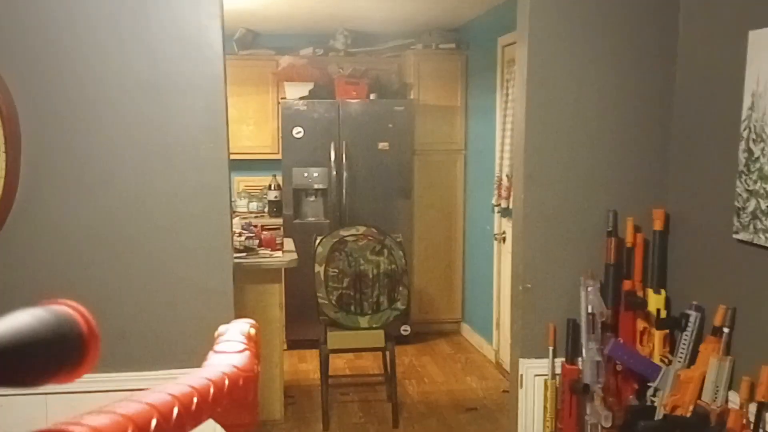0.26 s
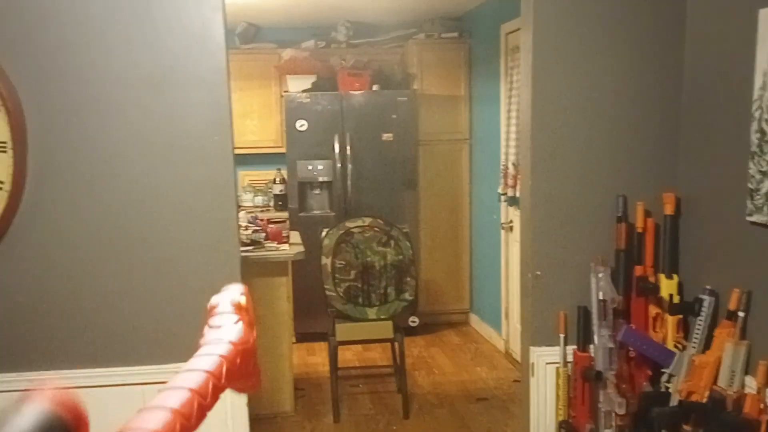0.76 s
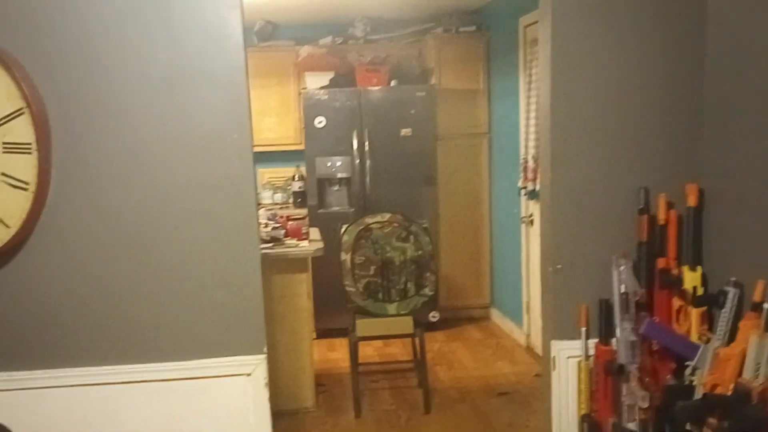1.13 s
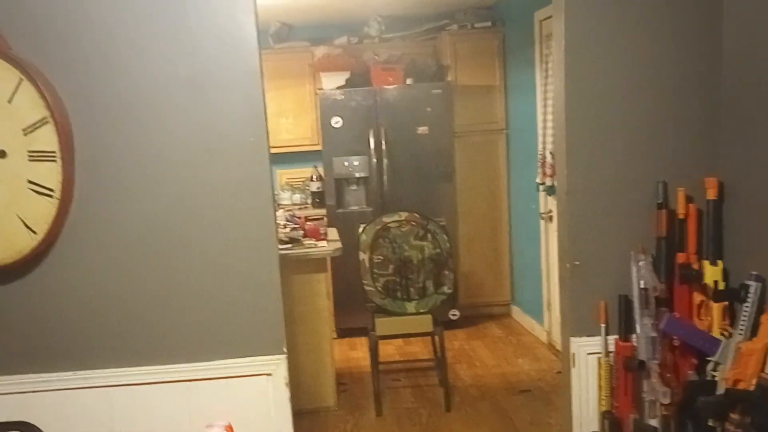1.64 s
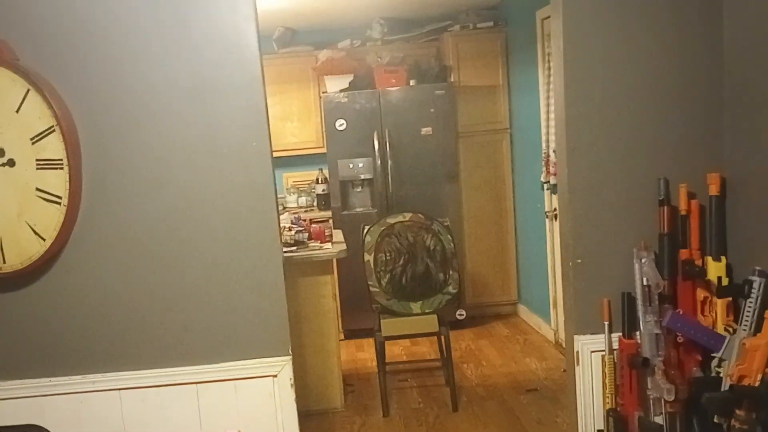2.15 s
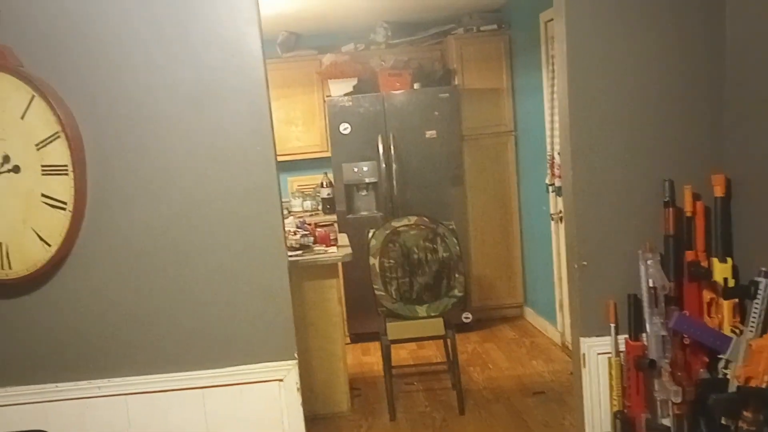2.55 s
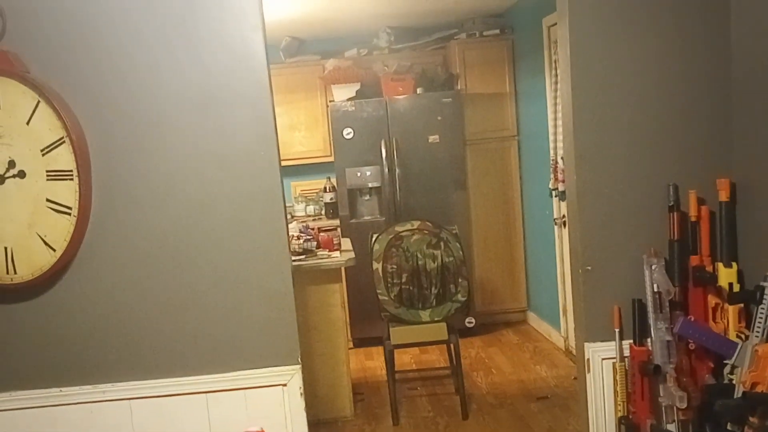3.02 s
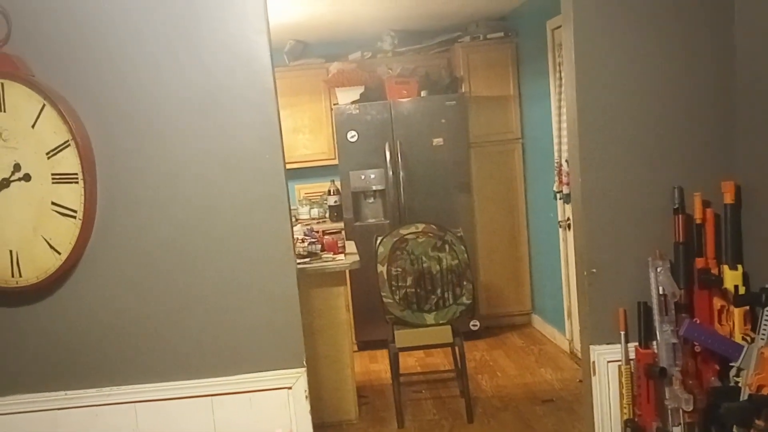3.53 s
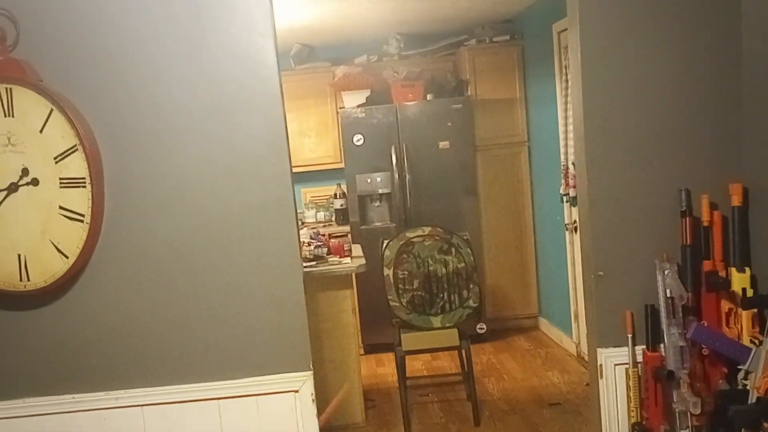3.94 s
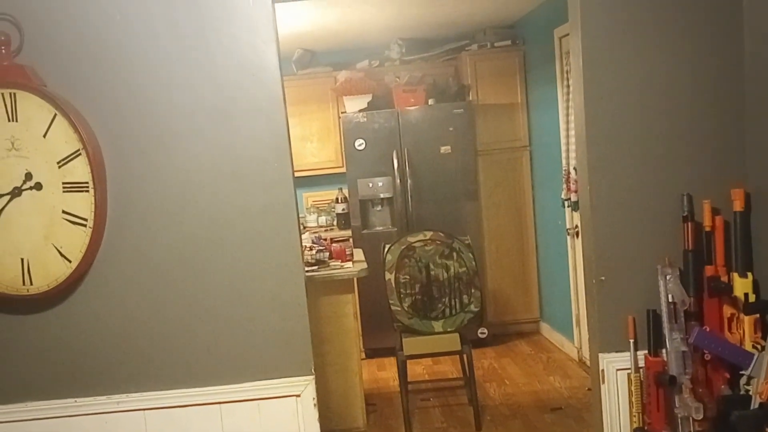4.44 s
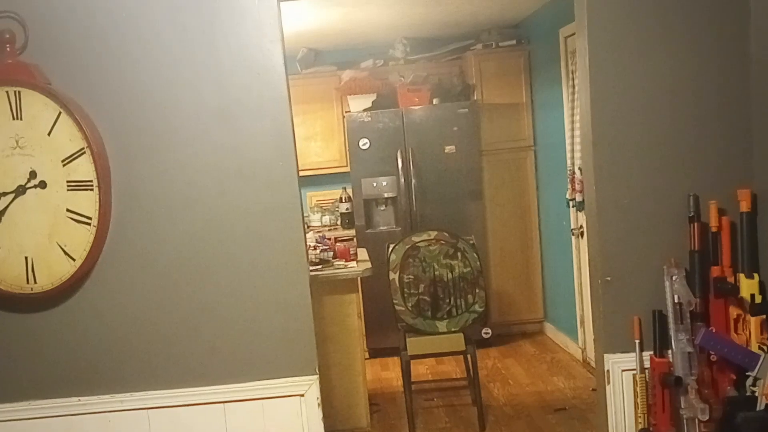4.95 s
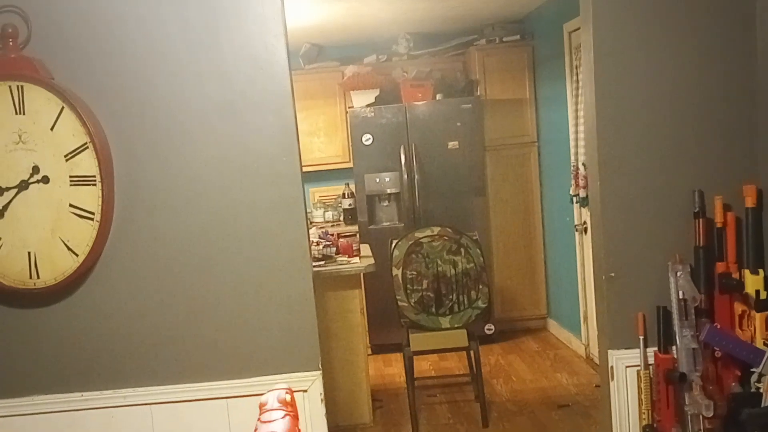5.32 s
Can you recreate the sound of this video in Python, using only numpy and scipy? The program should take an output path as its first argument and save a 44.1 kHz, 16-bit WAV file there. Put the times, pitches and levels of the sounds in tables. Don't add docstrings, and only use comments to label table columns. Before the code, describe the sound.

A plastic spring-powered dart blaster is handled very close to a stereo microphone in a hallway. For the first 0.9 seconds there are only small shell creaks and dull ticks over quiet air and a faint, wavering low appliance hum. Latch clicks begin near 0.95, a rapid ratcheting pull runs from 1.02 to 1.1, and the slide is pushed home with a rattling clack around 1.4. At 2.0 the first shot bursts out: a brief rush, loud hollow pop, bright crack and piston rebound. Soft bumps and clacks follow, with repriming from 2.2 to 2.7 and a second shot at 2.95. Another ratcheting cycle at 3.15 to 3.6 leads to the third shot at 4.0. The last priming spans 4.2 to 4.75, then near quiet, a tiny creak at 5.45 and the final pop at 5.5. Each sharp knock leaves a short hall ring that is quickly choked off.

```python
import sys
import numpy as np
from scipy import signal
from scipy.fft import rfft, irfft
from scipy.io import wavfile
from scipy.ndimage import uniform_filter1d

SR = 44100
rng = np.random.default_rng(int(sys.argv[2]) if len(sys.argv) > 2 else 0)


def boost_factor(decibels):
    exponent = np.asarray(decibels, float) / 20
    return 10 ** exponent


def unload_wav(signal):
    wavfile.write(
        sys.argv[1],
        SR,
        np.round(np.clip(np.atleast_2d(signal).T, -1, 1) * 32767).astype(np.int16),
    )


N = 246078

# frequency in Hz, density in dB per Hz.
HOUSE_AIR = [(18, -45), (30, -22), (76, -2.5), (196, -4.5), (254, -3.5), (311, -14), (403, -5.5),
             (1040, -16), (6150, -29.5), (8810, -47), (14000, -38)]
# middle in seconds, level in dB, half length in seconds.
DRONE_SWELLS = [(0.001, -61, .03), (.17, -67, .04), (.36, -66, 0.039), (.53, -67, 0.054),
                (1.27, -71.5, 0.05), (1.53, -57.5, 0.037), (1.67, -73, .05), (2.25, -56.5, 0.054),
                (2.53, -61.5, .07), (2.75, -67, 0.068), (3.17, -57.5, 0.029), (3.45, -70, 0.062),
                (3.77, -64, 0.099), (4.33, -64.5, 0.11), (4.6, -67, 0.032), (4.86, -67, 0.047),
                (5.08, -65, 0.13)]
# start in seconds, level in dB, ring in Hz, ring width in Hz, t60 in s.
CREAKS = [(0.027, -53.5, 2420, 485, 0.26), (.050, -63, 5250, 910, 0.21), (.095, -62, 2580, 500, 0.073),
          (.092, -64, 4600, 700, 0.086), (0.305, -48, 580, 300, 0.19), (0.311, -47.5, 1500, 1070, 0.19),
          (0.317, -53, 3670, 590, 0.22), (0.459, -43, 1500, 300, 0.11), (0.537, -65, 4940, 900, 0.15),
          (0.572, -44.5, 1250, 490, 0.22), (.664, -38.5, 1890, 397, 0.073),
          (0.657, -47.5, 4520, 1500, 0.051), (.664, -58, 3500, 495, 0.12), (0.774, -61.5, 3600, 464, 0.24),
          (.922, -57, 2940, 2000, 0.18), (3.968, -56.5, 1700, 504, .08), (5.446, -61.5, 1500, 585, 0.11)]
# start in seconds, level in dB.
CREAK_TICKS = [(0.028, -55.5), (0.305, -66), (.319, -67), (0.458, -59), (.537, -61), (.571, -73),
               (0.655, -47), (0.662, -54), (0.92, -55.5), (3.968, -68.5)]
# time in seconds, crack in dB, hollow part in dB re crack.
SLIDE_KNOCKS = [(0.9437, -34.5, -9), (0.9554, -27, -6.5), (0.9653, -33.5, -2.5), (0.976, -34.5, -5.5),
                (0.9979, -19.5, -19.5), (1.2363, -25, -7.5), (1.3211, -25, -13), (2.1839, -21.5, -10),
                (2.2065, -21.5, -8.5), (2.324, -23, -7), (2.5373, -25, -18.5), (2.601, -34.5, -2),
                (2.612, -23, -6), (3.1385, -25, 0), (3.1625, -32.5, 4.5), (3.2118, -20, 1),
                (3.4065, -23, -10), (3.4484, -32, 1), (3.468, -25.5, -0.5), (4.191, -28, -2.5),
                (4.2115, -19, -3.8), (4.3776, -27, 3), (4.39, -26.5, 7), (4.5941, -24.5, -8),
                (4.6448, -33.5, 0), (4.6578, -25, -6), (4.675, -54, -10.5)]
# first tooth in seconds, end stop in seconds, teeth (count),
# crowding of the teeth towards the end (0 to 1), tooth level in dB.
PULLS = [
    (1.024, 1.0942, 8, 0.76, -23.5),
    (2.3383, 2.404, 9, 0.18, -23.5),
    (3.225, 3.2855, 9, 0.2, -22.5),
    (4.399, 4.4845, 9, 0.33, -23),
]
# first tooth in seconds, end stop in seconds, tooth in dB, end stop in dB.
PUSHES = [
    (1.354, 1.422, -22.5, -18.5),
    (2.6397, 2.688, -22.5, -16.5),
    (3.492, 3.567, -21.5, -20.5),
    (4.6831, 4.7466, -22, -20),
]
# frequency in Hz, density in dB per Hz.
CRACK_COLOUR = [(900, 0), (2000, -7), (6000, -5.5), (16000, -5)]
# frequency in Hz, width in Hz, level in dB.
SHELL_MODES = [(1220, 46, -5), (1700, 130, -4.5), (2307, 150, -9), (3500, 93, 1), (4310, 140, -2.5),
               (4600, 73, -0.5), (5615, 490, -2.5), (6470, 590, -4), (9600, 310, -12)]
# frequency in Hz, width in Hz, level in dB.
CAVITY_MODES = [(480, 140, -6.5), (700, 78, 2.5), (923, 74, -1.5)]
# start in seconds, level in dB, ring in Hz, width in Hz, t60 in s.
BUMPS = [(2.208, -41.5, 366, 200, 0.087), (2.311, -30.5, 670, 250, 0.14), (3.201, -41, 596, 250, 0.14),
         (3.430, -34, 493, 200, 0.32), (3.487, -45.5, 250, 100, 0.061), (3.759, -52.5, 493, 150, .08),
         (3.780, -51, 480, 150, 0.047), (4.213, -34, 374, 150, 0.12), (4.265, -40, 225, 80, 0.049),
         (4.37, -46.5, 700, 300, 0.14), (1.4, -48, 300, 120, 0.1), (1.095, -46.5, 310, 100, 0.12),
         (3.279, -44.5, 300, 122.3, 0.12)]
# pop in seconds, pop in dB, crack in dB, piston travel in seconds, rebound delay in seconds.
SHOTS = [
    (1.995, -3, -14.5, 0.0092, 0.01),
    (2.9565, -1.5, -16, 0.0078, 0.0042),
    (4.0084, -3, -15.5, 0.01, 0.008),
    (5.4902, -1.5, -12.5, 0.0094, 0.0094),
]
# frequency in Hz, level in dB, t60 in seconds.
BARREL_MODES = [(674, -0.5, 0.0084), (1500, -10, 0.0088), (200, -18.5, 0.028)]
# delay in seconds, level in dB.
FIRST_REFLECTIONS = [
    [(.0011, -15.5), (.0027, -2), (.0046, -7.5)],
    [(.0008, -2.5), (.0021, -5.5), (.0039, -4)],
]
# frequency in Hz, left minus right in dB.
PORT_TILT = [(100, 1.5), (500, -.6), (1200, -1.1), (4000, 1.2), (8000, 3.3), (13000, 5.4)]
# frequency in Hz, left-right likeness (0 to 1).
LIKENESS = [(30, .4), (90, 1), (300, 0.82), (700, 0.23), (1400, 0.13), (3000, 0.42), (16000, 0.19)]
# frequency in Hz, echo in dB, t60 in seconds, gate closing in seconds, gate leak in dB.
HALL_TAIL = [(100, -20, 0.87, 0.17, -11.5), (300, -16, 0.44, 0.29, -12.5), (700, -20.5, 0.55, 0.19, -21.5),
             (2000, -10, 0.53, 0.21, -17), (5000, -13.5, 0.59, 0.2, -24.5), (9900, -12, 0.21, 0.18, -38.5),
             (16500, -20.5, 0.75, 0.17, -37)]
# frequency in Hz, width in Hz, level in dB.
HALL_MODES = [(102, 9.2, 3), (332, 12, 8), (480, 8.9, 5), (625, 60, 6.5), (665, 170, 2), (913, 13, 7),
              (1700, 42, -4.5)]
# frequency in Hz, gain in dB.
GRILLE = [(900, 0), (1100, 0), (1700, 7), (2300, 3), (3000, -3.5), (4200, -1), (5500, -3), (6600, -3),
          (7600, -10), (9200, -5), (13500, -8.5), (14500, -4), (15600, 3.5), (16400, -15)]

AIR_DB, HUM_LINE_DB, HISS_DB = -67, -73.5, -92.5
DRONE_REST_DB = -85
BOOM_DELAY_S, BOOM_DB, BOOM_HALF_S = 0.065, -47.5, 0.058
TOOTH_JITTER_S, TOOTH_SCATTER_DB, TOOTH_GROWTH_DB = 0.0004, 1.16, 1
HOLLOW_FIRST_DB, HOLLOW_SAG_DB, HOLLOW_LAST_DB, HOLLOW_STOP_DB = -11.5, -4.5, -3.5, -4.5
PULL_STOP_DB, PUSH_TEETH = -14.5, 7
BOUNCE_S, BOUNCE_DB = 0.01, -1.5
SHELL_UNEVEN_DB = 3.0
RUSH_DB, REBOUND_DB = -20, -17
PORT_LAG = 10
GATE_STEEPNESS = 9
HALL_CLUMPS_DB, HALL_PATCHY_DB = 1.1, 1.2


def rms_one(x):
    return x / np.sqrt(np.mean(x ** 2) + 1e-20)


def at_hz(points, hz, column=1):
    points = np.array(points)
    return np.interp(np.log(hz), np.log(points[:, 0]), points[:, column])


def coloured(x, points):
    size = 4096
    hz = np.maximum(np.arange(size // 2 + 1), 1) * SR / size
    cepstrum = irfft(np.log(boost_factor(at_hz(points, hz))))
    cepstrum[1:size // 2] *= 2
    cepstrum[size // 2 + 1:] = 0
    impulse = irfft(np.exp(rfft(cepstrum)))
    return signal.oaconvolve(x, impulse)[:len(x)]


def resonance(x, hz, width_hz):
    r = np.exp(-np.pi * width_hz / SR)
    feed = np.array([1, 0, -1]) * (1 - r * r) / 2
    return signal.lfilter(feed, [1, -2 * r * np.cos(2 * np.pi * hz / SR), r * r], x)


def half_octave(x, low, high):
    return signal.sosfilt(signal.butter(2, [low, high], "band", fs=SR, output="sos"), x)


def bursts(times, level_db, rise_s, t60):
    t = np.arange(int(2 * t60 * SR)) / SR
    shape = (1 - np.exp(-t / rise_s)) * boost_factor(-60 * t / t60)
    marks = np.zeros(N)
    marks[(np.asarray(times) * SR).astype(int)] = boost_factor(level_db)
    return signal.oaconvolve(marks, shape / shape.max())[:N]


def wander(per_s):
    knots = np.arange(0, N + SR, SR / per_s)
    return np.interp(np.arange(N), knots, rng.standard_normal(len(knots)))


def diffuse_bands():
    edges = 30 * 2 ** np.arange(0, 9.6, 0.5)
    white = rng.standard_normal((2, 2, N))
    for k, (low, high) in enumerate(zip(edges, edges[1:])):
        hz = np.sqrt(low * high)
        mid, side = half_octave(white[k % 2], low, high)
        alike = np.clip(at_hz(LIKENESS, hz), 0, 1)
        yield hz, np.sqrt(1 + alike) * mid + np.sqrt(1 - alike) * side * [[1], [-1]]


def spot(s, db, hz, width_hz, t60, rise_s):
    out = bursts([s], db, rise_s, t60)
    i = slice(int(s * SR), int((s + 0.22) * SR))
    rub = rng.standard_normal(len(out[i]))
    out[i] *= rms_one(resonance(resonance(rub, hz, width_hz), hz, 2 * width_hz))
    return out


def plastic(crack, hollow):
    bright = rms_one(coloured(rng.standard_normal(N), CRACK_COLOUR)) * crack
    bright += sum(boost_factor(db + 6.5 + SHELL_UNEVEN_DB * wander(90)) * resonance(bright, hz, width)
                  for hz, width, db in SHELL_MODES)
    contact = rng.standard_normal(N) * hollow
    cavity = 0
    for k, (hz, width, db) in enumerate(CAVITY_MODES):
        cavity = cavity + boost_factor(db) * resonance(contact, hz, width) * (-1) ** k
    bright = coloured(bright, [(300, -30), (900, 1)])
    cavity = coloured(cavity, [(250, -16.5), (500, 0.5)])
    return boost_factor(-3) * bright + boost_factor(14) * cavity


def drone_level():
    t = np.arange(0, N + 40, 40) / SR
    booms = [(shot[0] + BOOM_DELAY_S, BOOM_DB, BOOM_HALF_S) for shot in SHOTS]
    level = boost_factor(DRONE_REST_DB)
    for s, db, half_s in list(DRONE_SWELLS) + booms:
        level = level + boost_factor(db) * np.exp(-((t - s) / half_s) ** 2)
    return np.interp(np.arange(N) / SR, t, level)


def house():
    air = sum(boost_factor(at_hz(HOUSE_AIR, hz) + 2.8 * wander(33)) * band for hz, band in diffuse_bands())
    pitch_hz = 99 + 7.0 * wander(20)
    drone = np.sqrt(2) * np.sin(2 * np.pi * np.cumsum(pitch_hz) / SR)
    drone = np.array([drone * boost_factor(-1.0), np.roll(drone, 3 * PORT_LAG) * boost_factor(0.9)])
    line = rms_one(resonance(rng.standard_normal(N), 261, 13))
    hiss = resonance(rng.standard_normal((2, N)), 15000, 1200)
    hiss = rms_one(resonance(hiss, 15000, 1200))
    still = boost_factor(AIR_DB) * rms_one(air) + boost_factor(HUM_LINE_DB) * line + boost_factor(HISS_DB) * hiss
    return still + drone_level() * drone


def handling():
    s, tick_db = np.transpose(CREAK_TICKS)
    ticks = plastic(bursts(s, tick_db, rise_s=0.0028, t60=0.088), 0)
    ticks = coloured(ticks, [(3000, 9.5), (6000, -4.5), (12000, 1)])
    return sum(spot(*row, rise_s=0.0013) for row in CREAKS), ticks


def stroke(first, stop, count, tooth_db, stop_db, crowding):
    u = np.arange(count) / count
    chance = rng.standard_normal((count, 3))
    s = first + (stop - first) * (u + crowding * u * (1 - u))
    s = s + TOOTH_JITTER_S * chance[:, 0] * (u > 0)
    crack_db = tooth_db + TOOTH_GROWTH_DB * (u - 0.5) + TOOTH_SCATTER_DB * chance[:, 1]
    hollow_db = np.interp(u, [0, 1], [HOLLOW_FIRST_DB, HOLLOW_LAST_DB])
    hollow_db = hollow_db + HOLLOW_SAG_DB * np.sin(np.pi * u) + TOOTH_SCATTER_DB * chance[:, 2]
    return list(zip(s, crack_db, hollow_db)) + [(stop, stop_db, HOLLOW_STOP_DB)]


def slide_contacts():
    rows = list(SLIDE_KNOCKS)
    for first, stop, teeth, crowding, tooth_db in PULLS:
        rows += stroke(first, stop, round(teeth), tooth_db, PULL_STOP_DB, crowding)
    for first, stop, tooth_db, stop_db in PUSHES:
        rows += stroke(first, stop, PUSH_TEETH, tooth_db, stop_db, crowding=0)
        rows += [(stop + BOUNCE_S, stop_db + BOUNCE_DB, HOLLOW_STOP_DB)]
    return rows


def ratchet():
    s, crack_db, hollow_db = np.transpose(slide_contacts())
    snap = bursts(s - 0.0008, crack_db, rise_s=0.0008, t60=0.013)
    hollow = bursts(s, crack_db + hollow_db - 2.0, rise_s=0.001, t60=0.021)
    return boost_factor(5) * plastic(snap, hollow)


def bumps():
    return sum(spot(*row, rise_s=0.019) for row in BUMPS)


def shots():
    s, pop_db, crack_db, travel, rebound = np.transpose(SHOTS)
    crack = bursts(s - travel, RUSH_DB, rise_s=0.0025, t60=0.1)
    crack += bursts(s, crack_db, rise_s=0.0004, t60=0.04)
    crack += bursts(s + rebound, REBOUND_DB - 3.5, rise_s=0.00073, t60=0.02)
    push = -bursts(s, pop_db, rise_s=0.00028, t60=0.0025) + 1e-18
    pop = 0
    for hz, db, t60 in BARREL_MODES:
        width = 2 * np.log(1000) / (np.pi * t60)
        swing = resonance(resonance(push, hz, width), hz, width)
        pop = pop + boost_factor(db) * swing / np.abs(swing).max() * boost_factor(pop_db.max())
    knock = -bursts(s + rebound, REBOUND_DB, rise_s=0.0003, t60=0.00079) + 1e-18
    knock = resonance(knock, 950, 500)
    return pop + boost_factor(7.5) * knock + plastic(crack, boost_factor(0.5) * crack)


def ports(x):
    out = []
    bright = coloured(x, [(1000, -21), (3000, 1.0)])
    for sign, lag, echoes in zip([1, -1], [0, PORT_LAG], FIRST_REFLECTIONS):
        side = x + sum(boost_factor(db) * np.roll(bright, int(s * SR)) for s, db in echoes)
        tilt = [(hz, sign * db / 2) for hz, db in PORT_TILT]
        out.append(np.roll(coloured(side, tilt), lag))
    return np.array(out) * (np.arange(N) > 0.01 * SR)


def unsquashed(x, share):
    level = np.sqrt(uniform_filter1d(x ** 2, 300) + 1e-10)
    return x * (level / boost_factor(-30.0)) ** share


def hall(x):
    out = 0
    step = 40
    clumps_db = HALL_CLUMPS_DB * wander(180)
    t = np.arange(int(0.9 * SR / step)) * step / SR
    build_up = 1 - np.exp(-(t / 0.008) ** 2)
    for hz, band in diffuse_bands():
        heard = half_octave(x, hz / 2 ** 0.25, hz * 2 ** 0.25)
        energy = uniform_filter1d(heard ** 2, step)[::step]
        echo_db, t60, shut_s, leak_db = [at_hz(HALL_TAIL, hz, column=k) for k in range(1, 5)]
        gate = boost_factor(-20 * (t / shut_s) ** GATE_STEEPNESS) + boost_factor(leak_db + 25 * t)
        fall = boost_factor(echo_db - 60 * t / t60) * gate * build_up
        level = np.sqrt(np.maximum(np.convolve(energy, fall ** 2)[:len(energy)], 0))
        level = np.interp(np.arange(N) / step, np.arange(len(level)), level)
        tilt = boost_factor(at_hz(PORT_TILT, hz) / 2 * np.array([[1], [-1]]))
        flicker = boost_factor(clumps_db + HALL_PATCHY_DB * wander(40))
        out = out + level * rms_one(band) * tilt * flicker
    return out + sum((boost_factor(db) - 1) * resonance(out, hz, width) for hz, width, db in HALL_MODES)


def scene():
    behind = house()
    rings, ticks = handling()
    strokes = ratchet() + bumps()
    fire = shots()
    into_hall = coloured(unsquashed(strokes, share=0.15), [(800, -4.0), (1700, -6), (4000, -3)])
    into_hall = into_hall + coloured(fire, [(800, -4.5), (3000, -3.0)]) + boost_factor(-10) * ticks
    near = ports(strokes + fire + ticks) + hall(into_hall)
    return np.array([coloured(side, GRILLE) for side in near]) + ports(rings) + behind


def low_pass(x):
    return signal.sosfilt(signal.butter(12, 16810, fs=SR, output="sos"), x)


def record(dry):
    cut = signal.sosfilt(signal.cheby2(10, 60, 16700, fs=SR, output="sos"), dry)
    return low_pass(np.clip(cut, -1, 1))


dry = scene()
out = record(dry)
unload_wav(out)
```